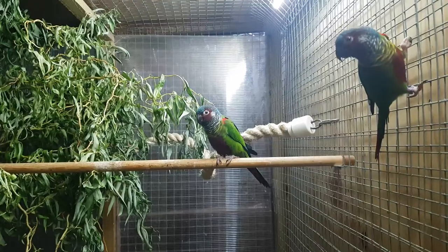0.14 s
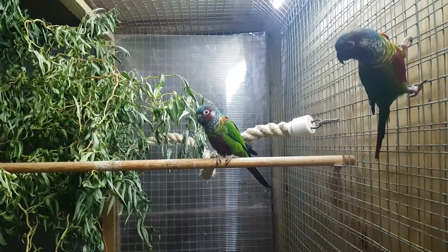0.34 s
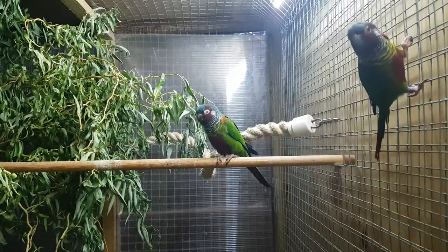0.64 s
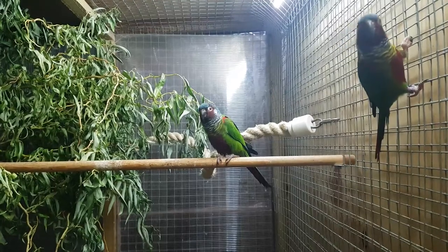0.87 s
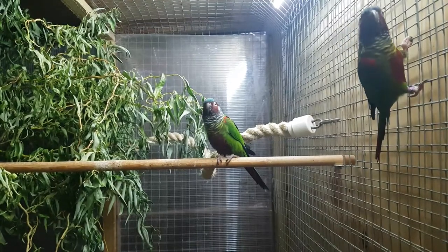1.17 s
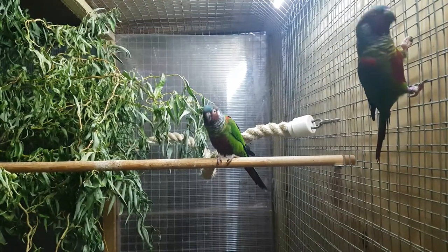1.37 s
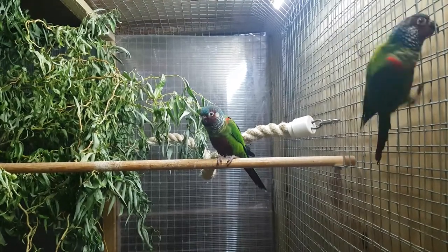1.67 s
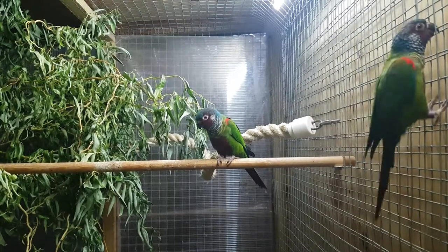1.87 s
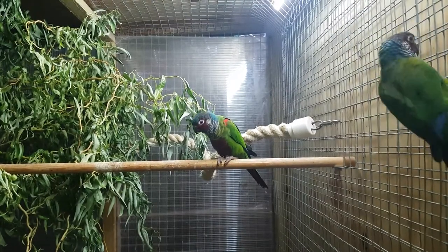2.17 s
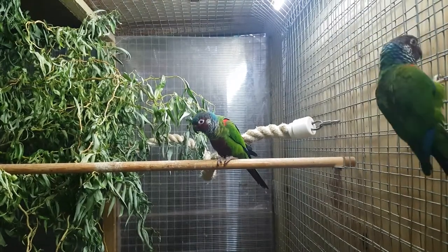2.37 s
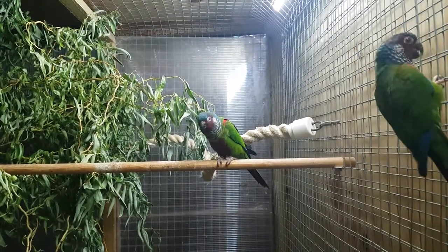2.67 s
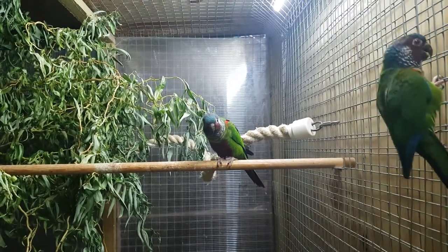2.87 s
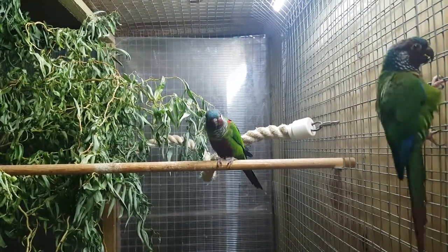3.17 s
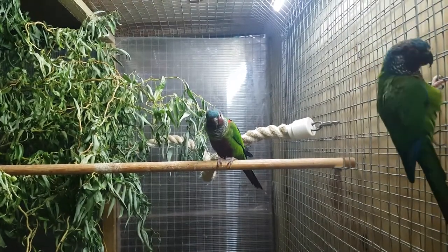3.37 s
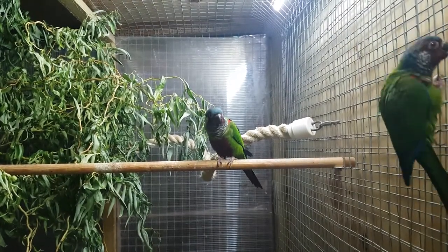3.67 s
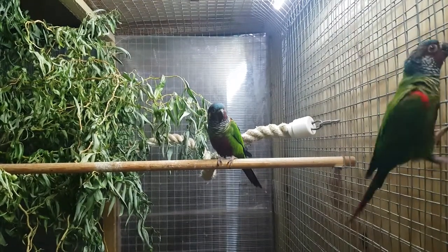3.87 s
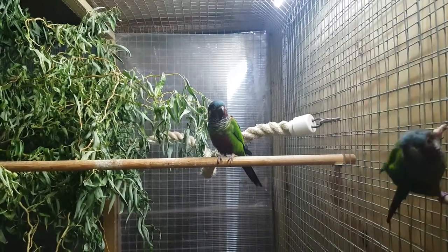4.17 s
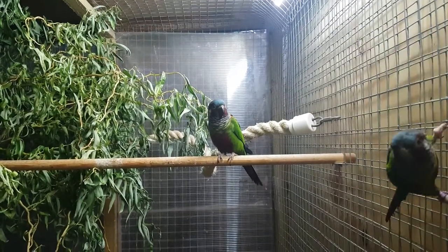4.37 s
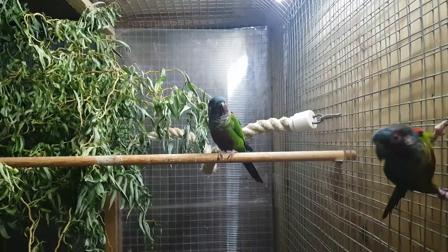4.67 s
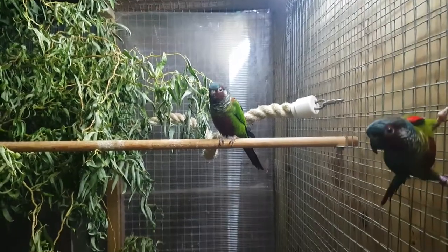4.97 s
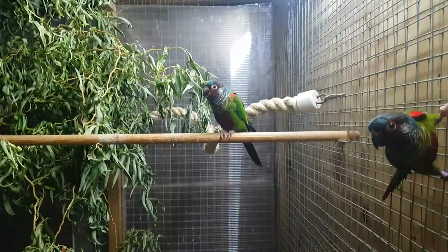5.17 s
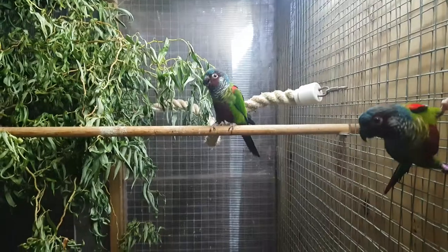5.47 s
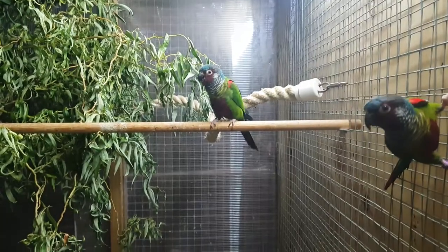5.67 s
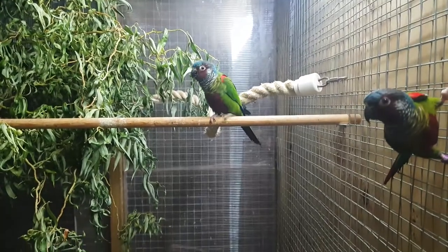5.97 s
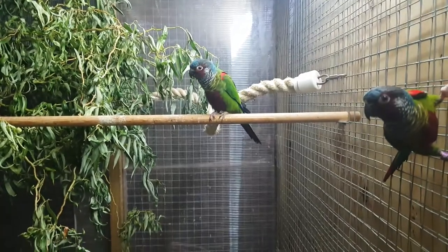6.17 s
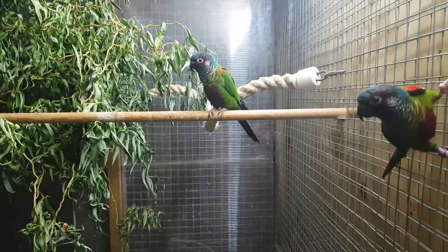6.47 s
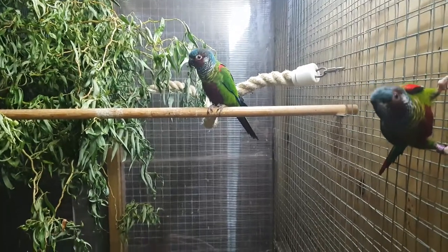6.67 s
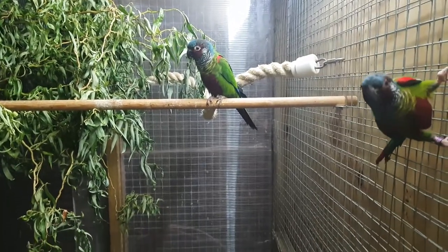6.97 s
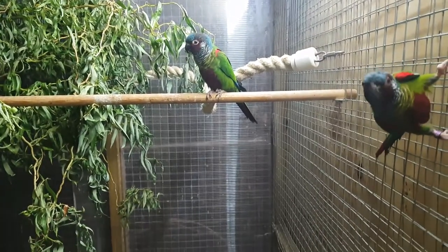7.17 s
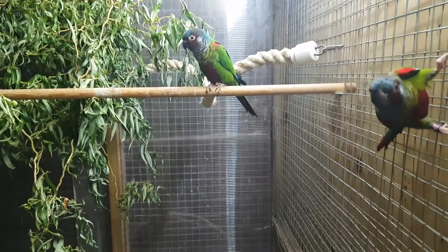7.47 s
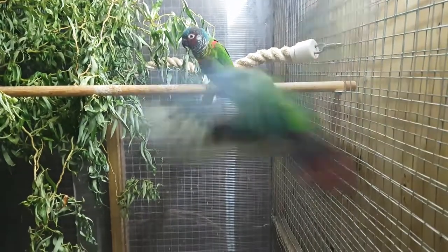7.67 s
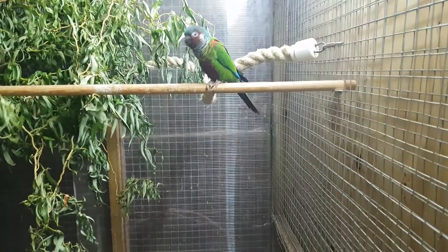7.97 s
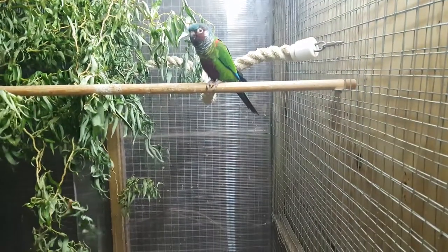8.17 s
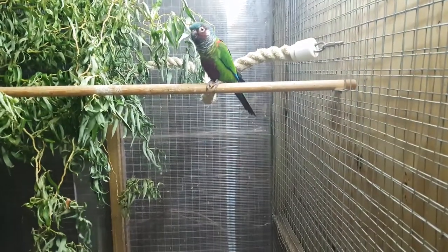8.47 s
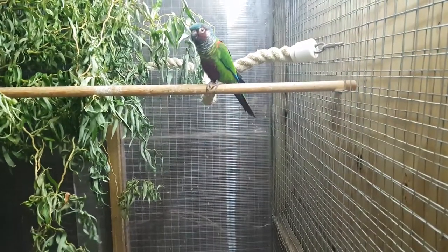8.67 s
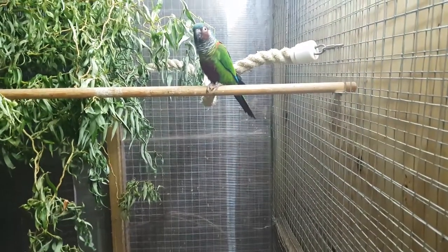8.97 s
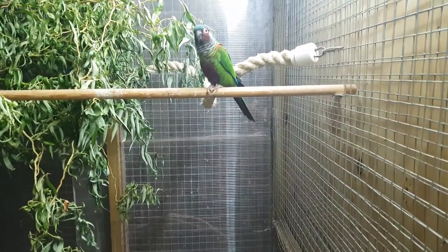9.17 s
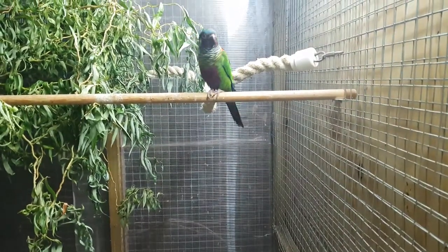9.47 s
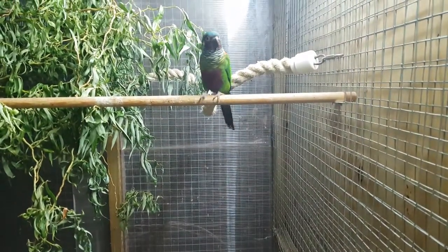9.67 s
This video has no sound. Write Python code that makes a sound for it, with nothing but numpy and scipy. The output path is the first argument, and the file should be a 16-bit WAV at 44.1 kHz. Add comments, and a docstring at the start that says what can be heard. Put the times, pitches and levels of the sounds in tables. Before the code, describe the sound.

Inside a wire aviary, distant birds call hoarsely and the mesh rattles softly under a climbing bird. A small parrot close to the microphone gives two loud bursts of clear, rising chatter. Wood knocks faintly, then a bird flies past with low wingbeats and a single call, and lands on the mesh. A last burst of chatter follows, over faint room rumble and hiss.

```python
"""Small parrots in a wire-mesh aviary inside a shed. Low room rumble and microphone hiss lie under it all.
First, distant birds call hoarsely, and the mesh rattles in showers of clicks as a bird climbs it. From 2 s
a near bird chatters in bursts of clear rising notes, harmonics of a membrane filtered by windpipe and beak.
At 6.5 s knocked wood rings faintly. At 7.7 s a bird flies past the microphone, each wing beat a low pulse
of pressure, and lands on the mesh. A last burst of chatter follows at 9 s."""
import sys
import numpy as np
from scipy import signal
from scipy.fft import rfft, irfft
from scipy.io import wavfile
from scipy.ndimage import uniform_filter1d, minimum_filter1d

SR = 44100
rng = np.random.default_rng(int(sys.argv[2]) if len(sys.argv) > 2 else 0)


def master(y):
    """Save y as 16-bit WAV."""
    cut = np.clip(np.atleast_2d(y).T, -1, 1)
    pcm = np.round(cut * 32767)  # scale
    wavfile.write(sys.argv[1], SR, pcm.astype(np.int16))


N = 433503


def amp(db):
    """Amplitude ratio of a level in decibels."""
    return 10 ** (np.asarray(db) / 20)


def unit_rms(x):
    """Normalisation to an rms of 1."""
    return x / np.sqrt(np.mean(x ** 2) + 1e-20)


def at_hz(points, hz):
    """Interpolation on a logarithmic frequency axis."""
    return np.interp(np.log(hz), np.log(np.array(points)[:, 0]), np.array(points)[:, 1])


def add(out, start, x):
    """Superposition: x joins out at start, in seconds."""
    i = round(start * SR)
    out[..., i:i + x.shape[-1]] += x[..., :N - i]


def pan(db):
    """Level difference, left over right, as two gains."""
    return amp([[db / 2], [-db / 2]])


def butterworth(x, order, hz, kind="low"):
    """Filtering with a maximally flat passband."""
    return signal.sosfilt(signal.butter(order, hz, kind, fs=SR, output="sos"), x)


def coloured(x, spectrum, tilt_db=0):
    """Spectral shaping, with a tilt per octave about 2 kHz."""
    hz = np.maximum(np.fft.rfftfreq(x.shape[-1], 1 / SR), 10)
    return irfft(rfft(x) * amp(at_hz(spectrum, hz) + tilt_db * np.log2(hz / 2000)), x.shape[-1])


# correlation of left and right: f/Hz, coefficient
CORRELATION = [(60, 0.64), (240, 0.57), (950, 0.24), (3770, -0.01), (15000, 0.02)]

def diffuse_noise():
    """Diffuse field: white noise, correlated at the two sides only at long wavelengths."""
    alike = np.clip(at_hz(CORRELATION, np.maximum(np.fft.rfftfreq(N, 1 / SR), 10)), 0, 1)
    mid, side = rfft(rng.standard_normal((2, N)))
    return irfft(np.sqrt(1 + alike) * mid + np.sqrt(1 - alike) * side * [[1], [-1]], N)


# room rumble and stirred air: t/s, relative level/dB below 150 Hz, relative level/dB above
RUMBLE_LEVELS = [(0, -63.5, -59.5), (3.7, -63.5, -62), (4.0, -61, -55.5), (6.15, -65, -66.5),
                 (6.63, -58, -60.5), (7.64, -63.5, -58), (7.91, -48, -60), (8.65, -82.5, -66),
                 (9.53, -84, -57.5), (9.83, -54, -73)]
# spectrum of the rumble: f/Hz, relative level/dB
RUMBLE_SPECTRUM = [(15, -36), (25, -7.5), (53, 0), (184, -3.5), (280, -9), (313, -7.5), (456, -8.5),
                   (777, -15.5), (3670, -27), (5000, -46), (6500, -75), (11000, -120)]
# spectrum of the hiss: f/Hz, relative level/dB
HISS_SPECTRUM = [(530, -45), (900, -7), (1390, -3.5), (1670, -9.5), (1820, -5), (3410, -1.5), (7780, -18.5),
                 (15000, -10.5), (16300, -19)]

def background():
    """Noise floor: microphone hiss and room rumble, swelling near 7.9 s as the passing bird stirs air."""
    times, low_db, upper_db = np.transpose(RUMBLE_LEVELS)
    t = np.arange(N) / SR
    rumble = coloured(diffuse_noise(), RUMBLE_SPECTRUM)
    low = unit_rms(butterworth(rumble, 2, 150)) * amp(np.interp(t, times, low_db))
    upper = unit_rms(butterworth(rumble, 2, 150, "high")) * amp(np.interp(t, times, upper_db))
    hiss = coloured(rng.standard_normal((2, N)), [(300, -23)] + list(HISS_SPECTRUM))
    return pan(-0.73) * amp(2.5) * (low - upper) + amp(-69.5) * unit_rms(hiss)


# modes of the wood: f/Hz, relative level/dB, T60/s
WOOD_MODES = [(190, -5, .07), (420, -4, .05), (800, -4, .03), (1500, -8, .011), (2300, -8, .009),
              (3400, 0, .011)]
# knocks: t/s, level/dB
WOOD_KNOCKS = [(6.524, -32.5), (6.585, -45.5)]

def wood_knocks():
    """Free vibration: each soft-edged knock excites the damped modes of the wood."""
    out, t = np.zeros((2, N)), np.arange(SR // 8) / SR
    hz, mode_db, t60 = np.transpose(WOOD_MODES)[:, :, None]
    for start, db in WOOD_KNOCKS:
        decay = amp(db + mode_db + rng.normal(0, 2.3, hz.shape) - 60 * t / t60)
        modes = decay * np.sin(2 * np.pi * hz * t)
        add(out, start, pan(5.2) * (1 - np.exp(-t / .0003)) * modes.sum(axis=0))
    return out


# downstrokes: t/s, level/dB
DOWNSTROKES = [(7.703, -27), (7.76, -27.5), (7.829, -52.5), (7.897, -34), (7.954, -35.5), (8.024, -38.5),
               (8.095, -40), (8.151, -40)]

def wings():
    """Air displacement: each down- and upstroke radiates one pressure cycle; stirred air rushes between."""
    out, t = np.zeros((2, N)), np.arange(-1500, 1500) / SR
    down_hz, up_hz, up_delay_s, up_db = 64, 100, .031, -43
    for beat, down_db in DOWNSTROKES:
        for centre, hz, db in ((beat, down_hz, down_db), (beat + up_delay_s, up_hz, up_db)):
            pulse = 1.62 * np.sin(2 * np.pi * hz * t) * np.exp(-(2.74 * hz * t) ** 2)
            add(out, centre + t[0], pan(-5.5) * amp(db) * pulse)
    rise_s, hold_s, fade_db_per_s = 0.098, 0.095, 65
    since = np.arange(N) / SR - DOWNSTROKES[0][0]
    swell = np.clip(1 + since / rise_s, 0, 1) * amp(-47.5 - fade_db_per_s * np.maximum(since - hold_s, 0))
    rush = butterworth(diffuse_noise(), 2, [70, 700], "band")
    return out + unit_rms(rush) * swell


# spectrum of the wires before the tilt: f/Hz, relative level/dB
MESH_SPECTRUM = [(88, -27), (150, 3.5), (414, 4.5), (578, 3), (759, -2), (1170, -3.5), (1260, -3.5),
                 (2980, -8.5), (4080, -18.5), (6260, -26), (8730, -39.5), (11000, -33), (14200, -37),
                 (16000, -53.5)]
# grips of claws and beak: t/s, level/dB, T60/s
GRIPS = [(0, -47.5, 0.2), (1.732, -35.5, 0.65), (1.851, -43.5, 0.55), (3.706, -47.5, 1.3),
         (3.781, -37, .43), (4.051, -48, 0.84), (4.128, -51, .69), (4.189, -40, 0.72), (4.475, -48, 0.056),
         (6.38, -58.5, .66), (7.665, -38.5, 2.5), (8.115, -47.5, 0.34), (8.245, -49.5, 1.7),
         (8.3, -37.5, .48), (9.74, -39.5, 0.61)]

def mesh_rattle():
    """Impact excitation: each grip shakes the wires into clumps of clicks; the treble is damped first."""
    out, t = np.zeros((2, N)), np.arange(1 << 15) / SR
    for start, db, t60 in GRIPS:
        clumps = amp(0.71 * unit_rms(uniform_filter1d(rng.standard_normal(len(t)), size=400)))
        clicks = rng.standard_normal((3, len(t))) * amp(2.2 * rng.standard_normal((3, len(t))))
        clicks = clicks[:2] + 0.48 * clicks[2]   # the third stream reaches both sides
        shower = unit_rms(coloured(clicks, MESH_SPECTRUM, tilt_db=4))
        body = butterworth(shower, 1, 3000)
        treble = (shower - body) * amp(-30 * t / t60)
        fade = (1 - np.exp(-t / (0.0015 * t60))) * np.cos(np.pi / 2 * t / t[-1])
        add(out, start, amp(db - 60 * t / t60) * fade * clumps * pan(-1.5) * (body + treble))
    return out


# reverberation time of the aviary before stretching: f/Hz, T60/s
REVERB_TIMES = [(500, 0.16), (2000, 0.17), (4500, 0.11), (9000, 0.092), (15000, 0.017)]

def reverberation(x, stretch, late_db, onset_s):
    """Reflections grow denser with time squared and decay by band; the shed adds a faint, slower tail."""
    t, response = np.arange(SR // 2) / SR, 0
    density = np.clip(.03 + (t / .03) ** 2, 0, 1)
    arrivals = rng.standard_normal((2, len(t))) * (rng.random((2, len(t))) < density) / np.sqrt(density)
    onset = 1 - np.exp(-(t / onset_s) ** 2)
    for k, low_hz in enumerate(250 * 2. ** np.arange(0, 6, .5)):
        t60 = stretch * at_hz(REVERB_TIMES, low_hz)
        decay = amp(-60 * t / t60) + amp(late_db - 60 * t / (2.8 * t60))
        band = butterworth(arrivals, 2, [low_hz, np.sqrt(2) * low_hz], "band") * decay * onset
        even = np.sqrt(low_hz / np.sum(band ** 2, axis=1, keepdims=True))   # equal energy per Hz
        response = response + (-1) ** k * even * band
    response /= np.sqrt(np.sum(response ** 2, axis=1, keepdims=True))
    return signal.fftconvolve(x, response, axes=1)[:, :N]


# transfer function of windpipe and beak: f/Hz, gain/dB
VOCAL_TRACT = [(900, -18), (1400, -8.5), (2250, -10), (2750, -10.5), (3300, 2), (4500, -3.5), (5100, -16.5),
               (5900, -7), (7000, -14.5), (9000, -21.5), (13000, -21), (16500, -37.5)]

def note(length, start_hz, top_hz, rise_s, fall_hz, hoarse, tilt_db=0):
    """Source and filter: a membrane's harmonics pass the vocal tract; the pitch sags as the breath ends."""
    t = np.arange(round(length * SR)) / SR
    slow, fast = (unit_rms(uniform_filter1d(rng.standard_normal(8000), n))[:len(t)] for n in (160, 30))
    hz = top_hz - (top_hz - start_hz) * np.exp(-t / rise_s) - fall_hz * (t / length) ** 5.1
    # the voice rasps as it starts and at a deep fall
    rasp = hoarse + .15 * np.exp(-t / .008) + .5 * fall_hz / top_hz * (t / length) ** 6
    hz = hz * (1 + .003 * slow + .12 * rasp * fast)   # an unsteady membrane smears every harmonic
    order = np.arange(1, 15)[:, None]
    opening_db = -12 * np.exp(-(t / 0.0086) ** 2) * (order > 2)   # overtones wait for the beak to open
    turn_db = rng.normal(0, 2, (14, 1))   # the head points elsewhere at every note
    harmonic_db = at_hz(VOCAL_TRACT, order * hz) + tilt_db * np.log2(order) + opening_db + turn_db
    phase = 2 * np.pi * np.cumsum(hz) / SR
    tone = np.sum(amp(harmonic_db) * (order * hz < 17500) * np.sin(order * phase), axis=0)
    swell = (1 - np.exp(-(t / 0.0033) ** 2)) * np.clip((length - t) / 0.0037, 0, 1)
    breath_db = -3 * np.exp(-t / 0.011)   # the breath takes a moment to reach full force
    flutter_db = 8 * rasp * slow[::-1]
    return swell * amp(flutter_db + breath_db) * unit_rms(tone)


# distant calls: t/s, duration/s, start f/Hz, target f/Hz, final fall/Hz, level/dB, tilt/(dB per octave)
DISTANT_CALLS = [ (0.443, .06, 1448, 1607, 50, -57, -5.5), (0.505, 0.074, 1900, 2020, 50, -59.5, -9),
                 (0.581, .11, 1620, 1990, 400, -48, -4.5), (0.738, 0.099, 2270, 2226, 30, -53, -7.5),
                 (0.809, 0.068, 2150, 1920, 100, -56, -11), (1.316, 0.02, 1440, 1090, 51.5, -49, -20),
                 (1.354, 0.046, 1255, 930, 61, -36.5, -16.5), (1.636, 0.096, 2616, 3750, 400, -33.5, -2.5),
                 (1.767, 0.12, 3390, 4550, 869, -34.5, 1.5), (1.863, 0.072, 3586, 5300, 50, -35.5, -13),
                 (1.862, 0.072, 1864, 1938, 149, -45, -8.5), (3.081, 0.08, 4820, 5300, 2313, -35, -5),
                 (3.566, .038, 5820, 5950, 303, -66, -5.5), (4.269, 0.025, 1690, 1670, 30, -59.5, -40),
                 (4.94, 0.056, 2320, 2690, 50, -51, -12), (5.015, 0.068, 4130, 3855, 30, -44.5, 4),
                 (5.531, .1, 4700, 2993, 90, -36, 0), (8.988, 0.089, 1763, 1468, 60, -54.5, -11.5)]

def far_birds():
    """Beyond the critical distance: reverberation outweighs the direct sound of these hoarser notes."""
    voice = np.zeros((1, N))
    for start, length, start_hz, target_hz, fall_hz, db, tilt_db in DISTANT_CALLS:
        call = note(length, start_hz, target_hz, .26 * length, fall_hz, hoarse=.4, tilt_db=tilt_db)
        add(voice, start, amp(db) * call)
    return amp(-6) * voice + pan(-4) * reverberation(voice, stretch=1, late_db=-30, onset_s=.002)


# perches: from t/s, left-right level difference/dB, lag of the left side/ms
NEAR_PERCHES = [(0, -3.5, .11), (4, -2, .06), (7, -.5, .39), (9, -.6, -.38)]
# long arched calls: t/s, duration/s, top f/Hz, rise time constant/s, final fall/Hz, level/dB
LONG_CALLS = [(2.064, 0.067, 1825, 0.0091, 489, -11), (2.469, 0.096, 2390, 0.022, 1073, -13),
              (5.08, 0.084, 2200, .015, 647, -11), (7.813, .069, 1920, .011, 411.5, -10),
              (9.124, 0.097, 2087, 0.01, 549, -13)]
# short chatter notes: t/s, duration/s, top f/Hz, rise time constant/s, level/dB
CHATTER_NOTES = [(2.645, 0.041, 2218, 0.0069, -9), (2.768, 0.042, 2301, 0.007, -10),
                 (2.899, 0.041, 2271, 0.0064, -6.5), (3.038, 0.039, 2258, 0.0058, -6),
                 (3.17, 0.047, 2310, 0.009, -9.5), (3.308, 0.049, 2259, 0.0061, -10.5),
                 (5.24, 0.046, 2320, 0.0096, -11), (5.369, 0.051, 2277, 0.009, -12.5),
                 (5.494, 0.057, 2338, 0.0091, -13), (5.623, .05, 2305, 0.0091, -10.5),
                 (5.774, .048, 2274, .0085, -11.5), (5.915, 0.052, 2276, .009, -10),
                 (9.3, 0.049, 2222, 0.0083, -13), (9.439, 0.053, 2244, 0.0084, -12.5),
                 (9.579, .048, 2191, 0.0079, -11), (9.709, 0.056, 2265, 0.012, -12)]

def near_bird():
    """Localisation: differences of level and arrival time place the bird; close walls reflect strongly."""
    direct = np.zeros((2, N))
    start_ratio, chatter_fall_hz = 0.56, 50
    chatter = [(*row, chatter_fall_hz, db) for *row, db in CHATTER_NOTES]
    for start, length, top_hz, rise_s, fall_hz, db in LONG_CALLS + chatter:
        pan_db, lag_ms = [perch for since, *perch in NEAR_PERCHES if since <= start][-1]
        call = note(length, start_ratio * top_hz, top_hz, rise_s, fall_hz, hoarse=.05)
        left, right = amp(db) * pan(pan_db) * call
        add(direct[0], start + lag_ms / 1000, left)
        add(direct[1], start, right)
    reflected = reverberation(direct, stretch=1.13, late_db=-34, onset_s=0.00061)
    return amp(-1.6) * direct + amp(-2.5) * reflected


def scene():
    """Superposition: the pressures of all sources add at the two microphones."""
    return background() + wood_knocks() + wings() + mesh_rattle() + far_birds() + near_bird()


def record(dry):
    """Band and peak limiting: the top is cut, and a look-ahead limiter holds down the highest peaks."""
    stopband_hz, ceiling = 16650, .95
    lowpass = signal.cheby2(16, 70, stopband_hz, fs=SR, output="sos")
    peaks = np.max(np.abs(signal.sosfilt(lowpass, dry)), axis=0)
    allowed_gain = np.minimum(ceiling / (peaks + 1e-9), 1)
    gain = uniform_filter1d(minimum_filter1d(allowed_gain, size=265), size=265)
    return signal.sosfilt(lowpass, dry * gain)


dry = scene()
out = record(dry)
master(out)
```